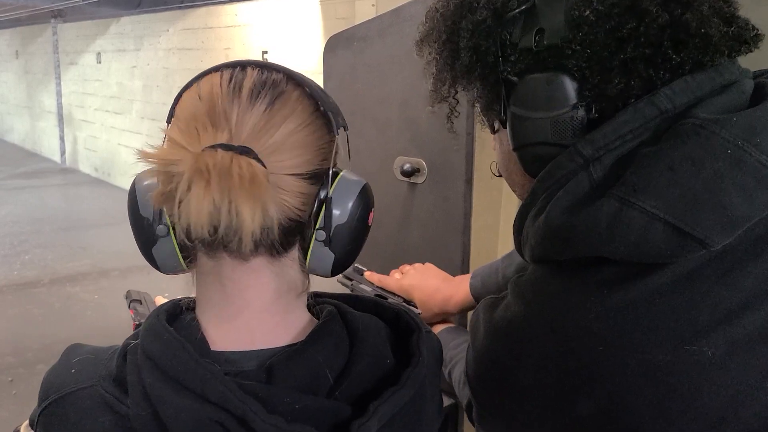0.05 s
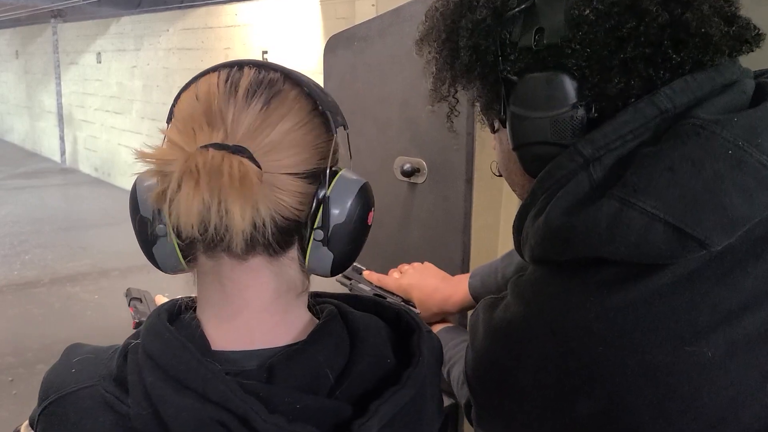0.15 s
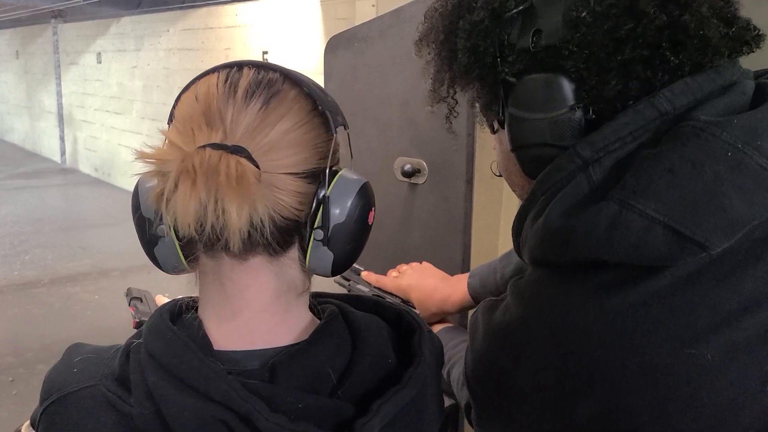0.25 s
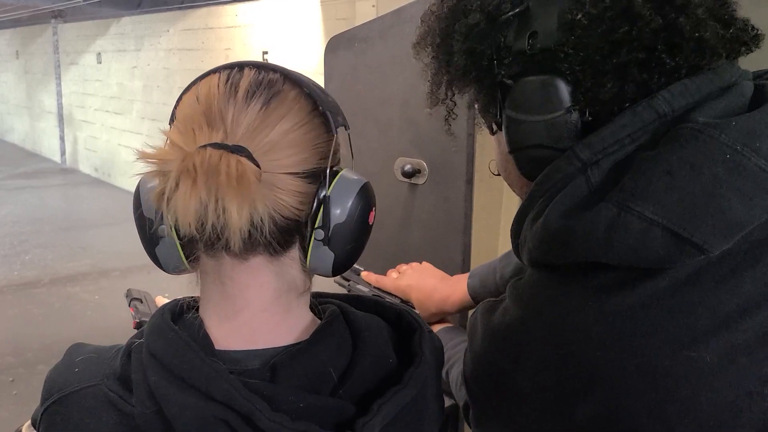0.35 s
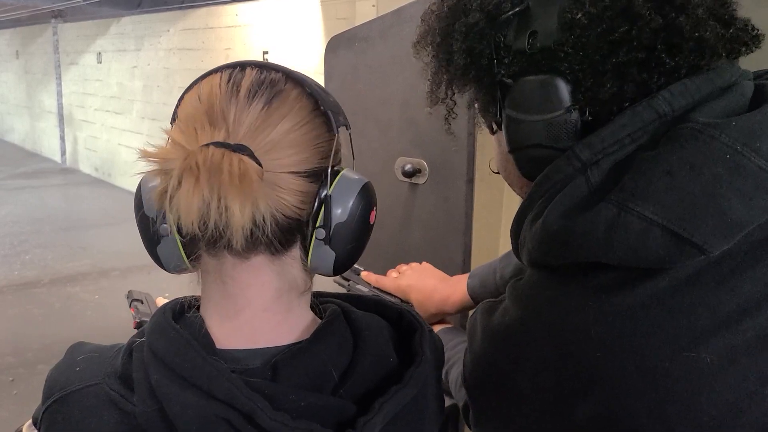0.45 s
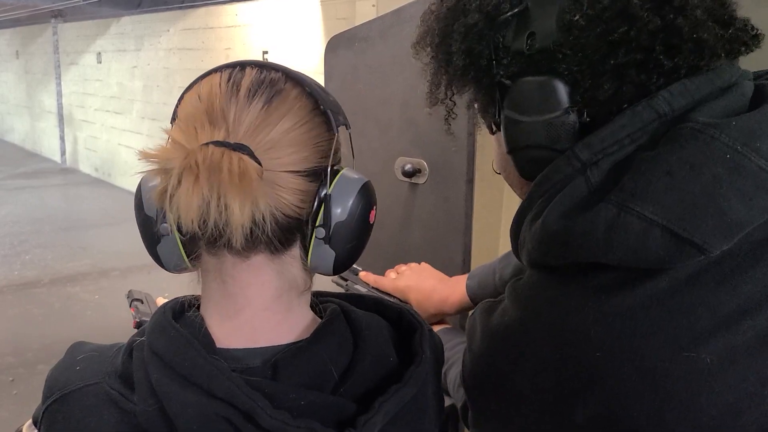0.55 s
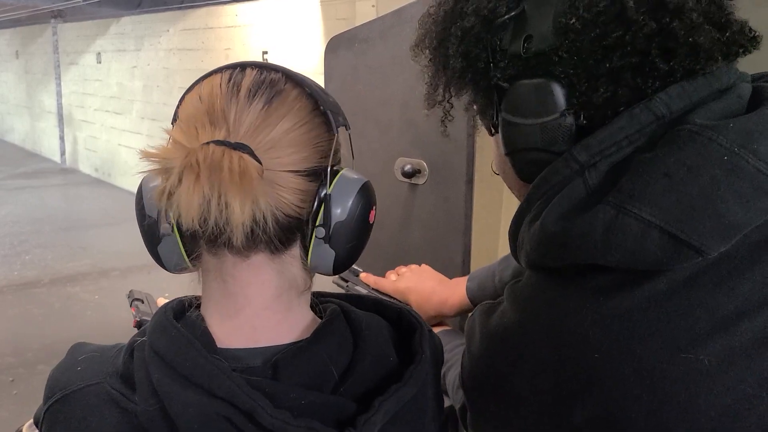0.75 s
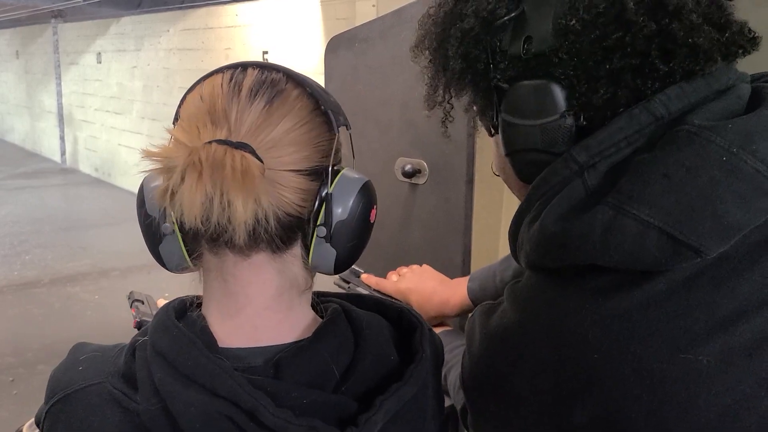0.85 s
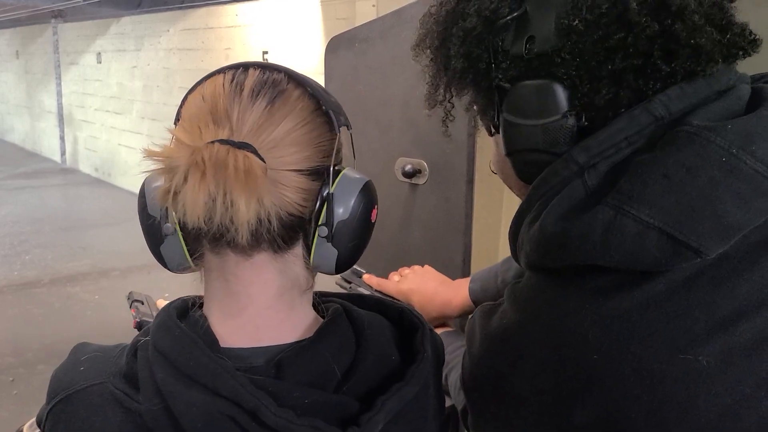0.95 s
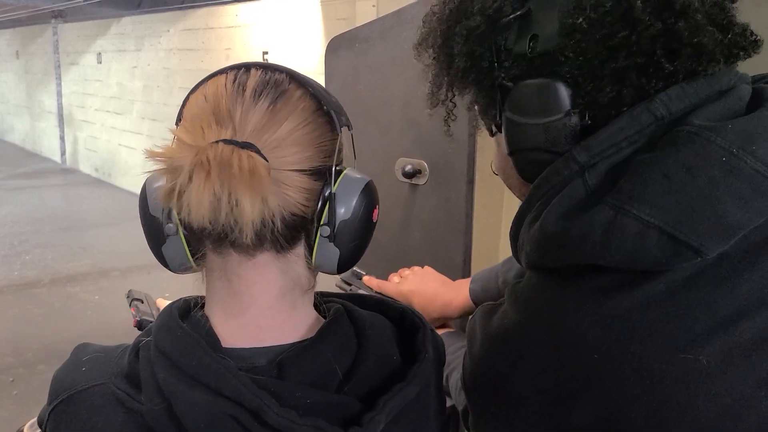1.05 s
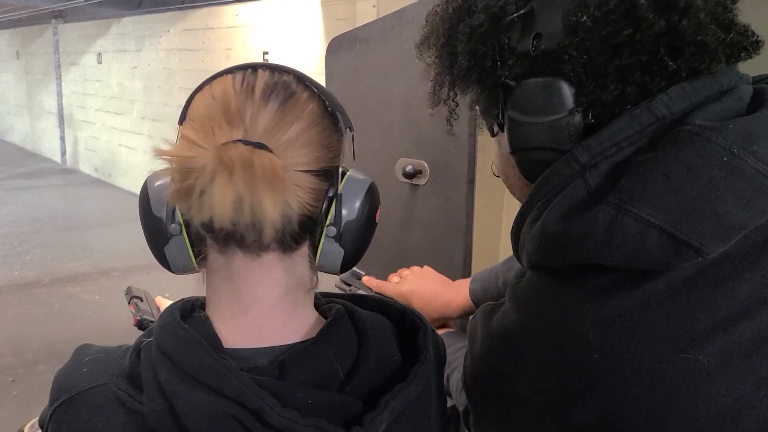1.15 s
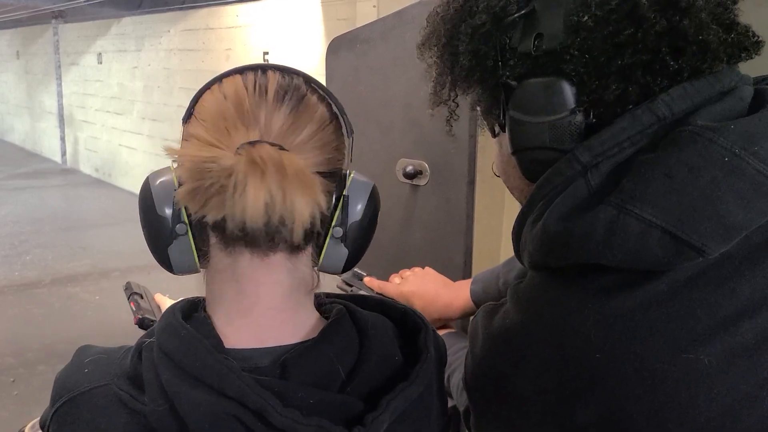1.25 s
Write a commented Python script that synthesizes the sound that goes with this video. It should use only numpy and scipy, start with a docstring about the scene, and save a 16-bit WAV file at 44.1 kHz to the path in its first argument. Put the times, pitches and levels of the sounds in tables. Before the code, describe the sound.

One loud gunshot cracks close by in an indoor shooting range, heard from just behind the booth. It booms off the walls and fades in a long echo, with a very faint shell case ping and low ventilation rumble.

```python
"""Gunshot in an indoor range

One shot is heard from just behind the firing booth. The muzzle blast arrives as a single pressure
wave, clatters between the booth walls and reverberates down the concrete hall. The spent case pings
faintly and ventilation rumbles underneath; a gain control ducks at the shot and recovers slowly."""
import sys
import numpy as np
from scipy import signal
from scipy.io import wavfile
from scipy.ndimage import uniform_filter1d

SR = 44100
rng = np.random.default_rng(int(sys.argv[2]) if len(sys.argv) > 2 else 0)


def transcribe(u):
    """Save the signal u as a 16-bit wav file named by the first command-line argument.

    u: samples, shape (n,) or (channels, n), limited to [-1, 1]; the rate is SR.
    q: integer samples, one column per channel.
    """
    v = np.clip(np.atleast_2d(u).T, -1, 1)
    q = np.round(v * 32767).astype(np.int16)
    wavfile.write(sys.argv[1], SR, q)


N = 57330
T = np.arange(N) / SR
SHOT_S, REFLECTION_RISE_S = .2485, .0044


def muzzle_blast():
    """Impulsive radiation: a small knock, then one push and pull of pressure with a low thump."""
    right_lag_s, knock_lead_s, low_cut_hz = .00049, .003, 180
    age = T - SHOT_S - np.array([[0], [right_lag_s]])
    knock = ring(age + knock_lead_s, db=-5, hz=900, t60=.006)
    blast = ring(age, db=17, hz=560, t60=.0085)
    thump = ring(age, db=1.5, hz=255.3, t60=.11)
    low_cut = signal.butter(1, low_cut_hz, "high", fs=SR, output="sos")
    return signal.sosfilt(low_cut, knock + blast + thump + 1e-18)


def shock_snap():
    """Scattering: the shock front glances off the bench in a bright, very short burst."""
    delay_s, centre_hz, width_octaves = .00086, 3540, 1.4
    age = T - SHOT_S - delay_s
    burst = diffuse(lambda hz: from_db(-11.5) * bell(np.log2(hz / centre_hz) / width_octaves))
    return burst * (age > 0) * fall(age, t60=.0083)


def booth():
    """Early reflections: dense returns from partitions, floor and ceiling excite the booth's resonances."""
    # reflection spectrum: (frequency [Hz], third-octave level [dB])
    spectrum = [(60, -52), (130, -55), (200, -21.5), (300, -13), (450, -8), (720, -8.5), (1150, -4),
                (1900, -13.5), (3500, -12), (7000, -25), (11000, -23), (15500, -25)]
    # booth resonances: (frequency [Hz], bandwidth [Hz], gain relative to the reflections [dB])
    modes = [(264, 50, -4.5), (426, 120, -3), (464, 45, -4.5), (1590, 32, -6.5), (2252, 58, 3),
             (2850, 12, -11), (5460, 67, 5.5)]
    age, hold_s = T - SHOT_S, .056
    clatter = diffuse(lambda hz: from_db(at_hz(spectrum, hz)), grain_db=3)
    reflections = clatter * rise(age, REFLECTION_RISE_S) * fall(age - hold_s, t60=.14)
    resonances = sum(
        from_db(db) * signal.lfilter(*signal.iirpeak(hz, hz / width, fs=SR), reflections + 1e-18)
        for hz, width, db in modes)
    return reflections + resonances


def echoes():
    """Superposition: reflections pile up into the booth's boom, then softer swells from down the range."""
    # reflection clusters: (time [s], level [dB], centre [Hz], width [octaves], spread [s])
    clusters = [(0.268, -17.5, 9000, 1.2, .005), (.279, -0.5, 389, 0.31, 0.0048),
                (0.366, -24, 2000, 1.77, 0.015), (.385, -23, 57.7, 0.19, .03),
                (.58, -25, 59.7, 0.34, 0.056), (.66, -29, 306, 0.63, 0.056),
                (1.045, -35.5, 127, 0.48, 0.033), (.99, -51.5, 1295, 1.15, 0.11)]
    swells = [(from_db(db) * bell((T - time) / spread), centre, width)
              for time, db, centre, width, spread in clusters]
    return diffuse(lambda hz: sum(swell * bell(np.log2(hz / centre) / width)
                                  for swell, centre, width in swells))


def hall():
    """Reverberation: the firing line rings briefly; in the hall, bass builds and fades slower than treble."""
    # hall decay: (frequency [Hz], third-octave level the decay starts from [dB], t60 [s], build-up [s])
    bands = [(30, -54, 0.87, 0.39), (58.5, -28, 3.5, 0.2), (122, -21, 2.26, 0.067), (231, -16.5, 2.02, 0.2),
             (507, -17.5, 1.895, 0.021), (803, -21.5, 2.13, 0.082), (1019, -16, 1.93, 0.014),
             (1470, -21, 1.89, 0.012), (2160, -26.5, 1.86, 0.05), (2600, -30, 1.66, 0.036),
             (4050, -24, 1.217, 0.025), (7700, -22, 0.91, 0.021), (14900, -18.5, 0.46, 0.013)]
    # ringing of the firing line: (frequency [Hz], third-octave level the decay starts from [dB])
    firing_line = [(100, -35), (400, -19), (1100, -10.5), (3000, -18), (8000, -21.5), (15000, -22)]
    age = T - SHOT_S

    def envelope(hz):
        db, t60, build_up = (at_hz(bands, hz, column) for column in (1, 2, 3))
        return from_db(db) * fall(age, t60) * rise(age, build_up) ** 2

    far = diffuse(envelope)
    near = diffuse(lambda hz: from_db(at_hz(firing_line, hz)))
    return far + near * rise(age, REFLECTION_RISE_S) * fall(age, t60=.62)


def standing_waves():
    """Room modes: low resonances of the hall swell in random phase and hum on under the tail."""
    # hall modes: (frequency [Hz], level the decay starts from [dB], build-up [s], t60 [s])
    modes = [(60, -15, 0.87, 1.4), (162.2, -16.5, 0.098, 1.74), (217.3, -22.5, 0.16, 2.2)]
    age = T - SHOT_S
    return sum(ring(age - rng.random() / hz, db, hz, t60) * rise(age, build_up)
               for hz, db, build_up, t60 in modes)


def spent_case():
    """Free vibration: the brass case lands on concrete and pings, its modes blurred by the room."""
    # case modes: (frequency [Hz], level [dB])
    modes = [(10270, -55), (11520, -57), (15650, -45)]
    landing_s, blur_hz = .70, 90
    age = T - landing_s
    blur = signal.butter(2, blur_hz, fs=SR, output="sos")
    ping = np.zeros((2, N))
    for hz, db in modes:
        flutter = rms_one(signal.sosfilt(blur, rng.standard_normal((2, N))))
        ping += from_db(db) * np.sin(2 * np.pi * hz * T) * flutter
    return ping * rise(age, .012) * fall(age, t60=.4)


def rustles():
    """Decaying noise bands: a faint high hiss and a small tick inside the tail."""
    # noise bursts: (time [s], level [dB], centre [Hz], width [octaves], rise [s], t60 [s])
    bursts = [(.70, -49.5, 13000, 1, .012, 0.57), (.738, -46, 4632, 0.54, .004, 0.067)]
    return diffuse(lambda hz: sum(
        from_db(db) * bell(np.log2(hz / centre) / width) * rise(T - time, attack) * fall(T - time, t60)
        for time, db, centre, width, attack, t60 in bursts))


def ventilation():
    """Stationary broadband noise: the low rush of the air system."""
    # air noise spectrum: (frequency [Hz], third-octave level [dB])
    spectrum = [(25, -53.5), (55, -44.5), (130, -39), (250, -46.5), (500, -52.5), (1000, -52.5),
                (3000, -57), (6000, -68.5), (10000, -72.5), (15000, -74)]
    return diffuse(lambda hz: from_db(at_hz(spectrum, hz)))


def diffuse(gain_at, grain_db=0):
    """Diffuse field: third-octave noise bands follow gain_at(hz); grain makes single arrivals stand out."""
    # likeness of left and right: (frequency [Hz], correlation [-1 to 1])
    coherence = [(60, 1), (160, 1), (300, 0.79), (480, 0.68), (750, 0.26), (1270, -0.34), (1900, 0.051),
                 (3300, 0.046), (15000, -0.01)]
    run_in, pan_db = SR // 4, .3
    length = N + run_in
    sides = np.array([[1], [-1]])
    white = rng.standard_normal((2, 2, length))
    grain = np.repeat(rng.standard_normal(length), 16)[:length]
    white *= from_db(grain_db * grain)
    field = np.zeros((2, N))
    for k, hz in enumerate(25 * 2 ** (np.arange(29) / 3)):
        band = signal.butter(2, [hz / 2 ** (1 / 6), hz * 2 ** (1 / 6)], "band", fs=SR, output="sos")
        # neighbouring bands use independent noise
        mid, side = (rms_one(noise[run_in:]) for noise in signal.sosfilt(band, white[k % 2]))
        alike = np.clip(at_hz(coherence, hz), -.999, .999)
        pair = np.sqrt((1 + alike) / 2) * mid + np.sqrt((1 - alike) / 2) * side * sides
        pan = from_db(-pan_db * (.5 - alike) * sides)  # treble leans slightly right
        field += gain_at(hz) * pair * pan
    return field


def ring(age, db, hz, t60):
    """Damped oscillation from age zero on."""
    return from_db(db) * np.sin(2 * np.pi * hz * np.maximum(age, 0)) * fall(age, t60)


def rise(age, length):
    """Raised-cosine onset from age zero on."""
    return np.sin(np.pi / 2 * np.clip(age / length, 0, 1)) ** 2


def fall(age, t60):
    """Exponential decay, 60 dB in t60 seconds, from age zero on."""
    return np.exp(-np.log(1000) * np.maximum(age, 0) / t60)


def bell(x):
    """Gaussian hump of height one."""
    return np.exp(-.5 * x ** 2)


def at_hz(rows, hz, column=1):
    """Interpolate one column of a table on a log-frequency axis."""
    rows = np.array(rows)
    return np.interp(np.log(hz), np.log(rows[:, 0]), rows[:, column])


def from_db(db):
    """Decibels to amplitude gain."""
    return 10 ** (np.asarray(db) / 20)


def rms_one(x):
    """Scale to unit rms."""
    return x / np.sqrt(np.mean(x ** 2) + 1e-20)


def scene():
    """Linear superposition of the shot, its room, the ringing case and the ventilation."""
    shot = muzzle_blast() + shock_snap() + booth()
    return shot + echoes() + hall() + standing_waves() + spent_case() + rustles() + ventilation()


def record(dry):
    """Automatic gain control ducks at once and recovers slowly; peaks saturate and the top is cut."""
    threshold_db, window_s, recovery_db_per_s = -8, .014, 3.5
    ceiling, cutoff_hz = .95, 15800
    power = uniform_filter1d(np.mean(dry ** 2, axis=0), int(window_s * SR))
    over_db = np.maximum(10 * np.log10(np.maximum(power, 1e-12)) - threshold_db, 0)
    recovery_db = recovery_db_per_s * T
    duck_db = np.maximum.accumulate(over_db + recovery_db) - recovery_db
    ducked = dry * from_db(-duck_db)
    rounded = ducked / (1 + (ducked / ceiling) ** 4) ** .25
    low_pass = signal.ellip(12, .1, 80, cutoff_hz, fs=SR, output="sos")
    return signal.sosfilt(low_pass, rounded)


dry = scene()
out = record(dry)
transcribe(out)
```